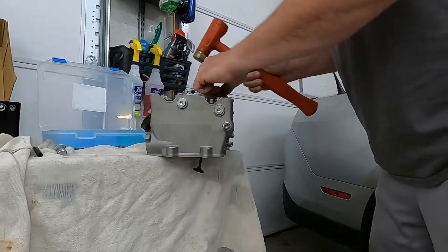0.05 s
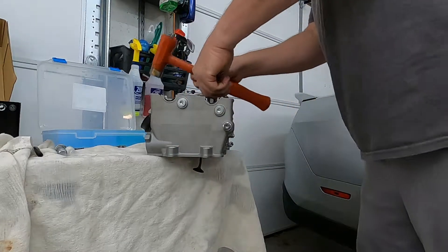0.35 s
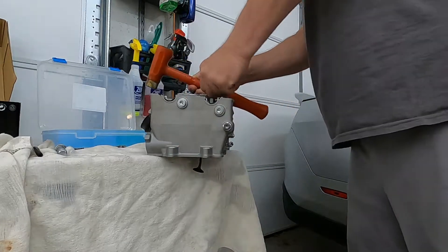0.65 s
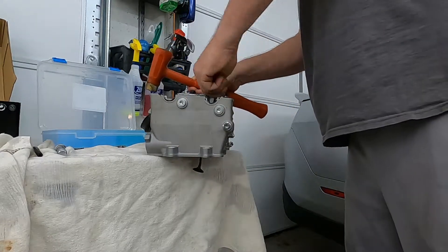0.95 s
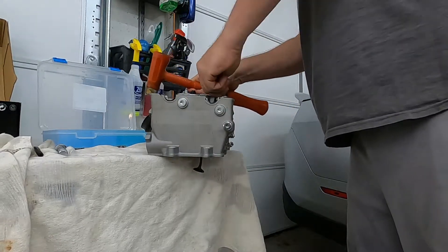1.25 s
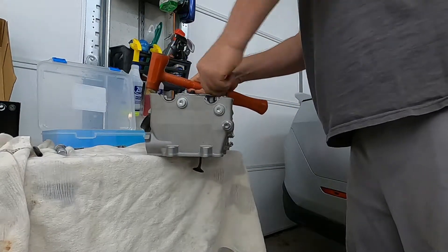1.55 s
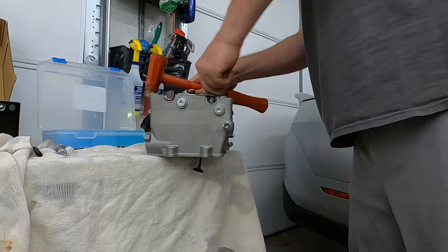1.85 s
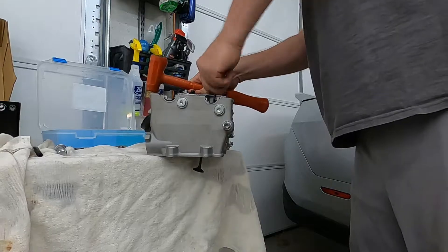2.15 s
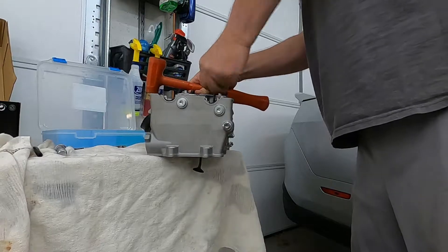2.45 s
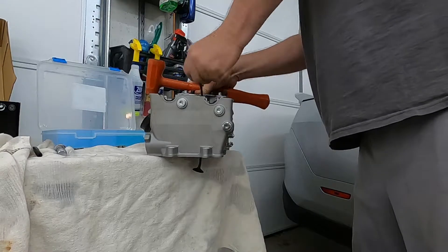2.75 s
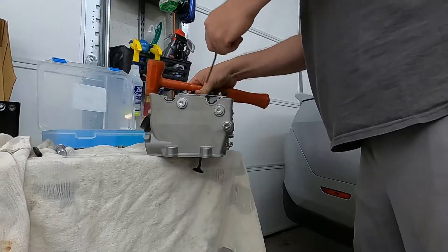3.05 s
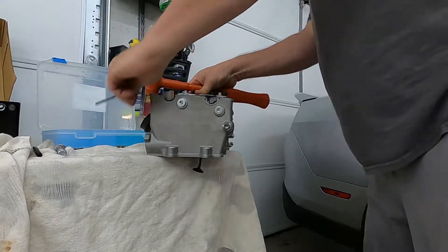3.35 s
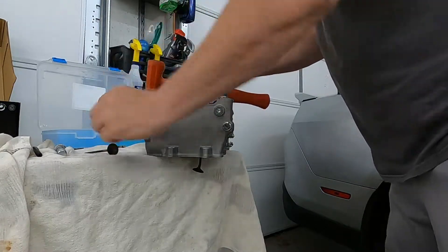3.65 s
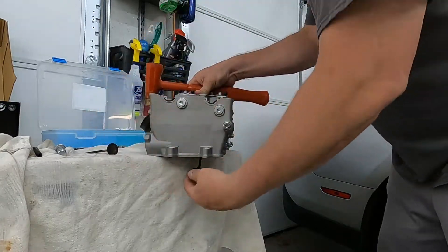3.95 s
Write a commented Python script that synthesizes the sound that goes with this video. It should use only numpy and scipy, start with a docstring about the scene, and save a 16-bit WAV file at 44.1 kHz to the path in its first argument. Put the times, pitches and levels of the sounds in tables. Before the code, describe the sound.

A steel key scrapes a tight screw, clatters free and thuds onto a bench.

```python
"""A long steel key works a tight screw in an aluminium engine housing on a cloth-covered garage bench.
A metal knock dies away over faint room hum, and clothes rustle as the arm reaches over. Each turn
scrapes in gritty stick-slip bursts and rocks the housing, with light ticks of steel on steel.
Near 2.85 s the key clatters free of the screw head; near 3.7 s it is set down with a thud and
a jingle. A few last ticks follow, and the clothes rustle again."""
import sys
import numpy as np
from scipy import signal
from scipy.fft import rfft, irfft, next_fast_len
from scipy.io import wavfile
from scipy.ndimage import map_coordinates

SR = 44100
rng = np.random.default_rng(int(sys.argv[2]) if len(sys.argv) > 2 else 0)


def master(y):
    """Save y as 16-bit WAV."""
    cut = np.clip(np.atleast_2d(y).T, -1, 1)
    pcm = np.round(cut * 32767)  # scale
    wavfile.write(sys.argv[1], SR, pcm.astype(np.int16))


N = 176400
T = np.arange(N) / SR

# how alike left and right are, from near mono bass to wide treble: freq_hz, correlation
STEREO_LIKENESS = [(50, 0.82), (250, 0.94), (600, 0.86), (1200, 0.66), (2500, 0.62), (4500, 0.23),
                   (12000, .05)]
LEFT_RIGHT = np.array([[.5], [-.5]])  # splits a difference between the two sides


def amp(db):
    """Decibels to gain."""
    return 10 ** (np.asarray(db) / 20)


def unit(x):
    """Scale to rms 1."""
    return x / np.sqrt(np.mean(x ** 2) + 1e-20)


def along(points, hz):
    """Read a curve of (freq_hz, value) points on a log frequency axis."""
    freqs, values = np.transpose(points)
    return np.interp(np.log(hz + 1), np.log(freqs + 1), values)


def fader(points):
    """Gain per sample from (time_s, level_db) points."""
    return amp(np.interp(T, *np.transpose(points)))


def filtered(x, response):
    """Zero-phase EQ; response maps frequency to gain."""
    size = next_fast_len(x.shape[-1] + SR // 4)
    gains = response(np.fft.rfftfreq(size, 1 / SR))
    return irfft(rfft(x, size) * gains, size)[..., :x.shape[-1]]


def colour(x, eq, size=8192):
    """Minimum-phase EQ: nothing rings ahead of an attack, and white noise keeps its power."""
    cepstrum = irfft(np.log(amp(along(eq, np.fft.rfftfreq(size, 1 / SR)))))
    cepstrum[1:size // 2] *= 2
    cepstrum[size // 2 + 1:] = 0
    impulse = irfft(np.exp(rfft(cepstrum)))
    return signal.fftconvolve(x, impulse[None] / np.linalg.norm(impulse), axes=1)[:, :N]


def add(track, start_s, x):
    """Mix x into the track at start_s."""
    i = max(0, round(start_s * SR))
    track[:, i:i + x.shape[-1]] += x[..., :max(0, N - i)]


def stereo_angle(hz):
    """Angle between left and right in radians: 0 is mono, pi/2 is unrelated."""
    return np.arccos(np.clip(along(STEREO_LIKENESS, hz), -1, 1))


def widen(pair):
    """Two unrelated signals become left and right, alike in the bass."""
    def mid_side_gains(hz):
        turn = stereo_angle(hz) / 2
        return np.array([np.cos(turn), np.sin(turn)])
    mid, side = filtered(pair, mid_side_gains)
    return np.array([mid + side, mid - side])


def panned(x, pan):
    """Tilt the sound between left and right, by frequency."""
    return filtered(x, lambda hz: amp(along(pan, hz) * LEFT_RIGHT))


def noise_bed(eq):
    """Steady coloured stereo noise of rms 1."""
    white = rng.standard_normal((2, N))
    return unit(widen(filtered(white, lambda hz: amp(along(eq, hz)))))


def garage(x, wet_db, build_s=0.0023):
    """The direct sound plus the garage's diffuse reverb, whose treble dies first."""
    # reverb time of the room: freq_hz, t60_s
    decay = [(100, 0.8), (400, 0.52), (1500, 0.56), (4000, 0.53), (8000, 0.42), (14000, 0.29)]
    hz, t, spectrum = signal.stft(rng.standard_normal((2, SR)), SR, nperseg=256)
    spectrum = spectrum * amp(-60 * t / along(decay, hz)[:, None])
    tail = signal.istft(spectrum, SR, nperseg=256)[1][:, :SR]
    tail = widen(tail) * (1 - np.exp(-(T[:SR] / build_s) ** 2))
    reverb = signal.fftconvolve(x[:1], tail / np.linalg.norm(tail[0]), axes=1)[:, :N]
    return x + amp(wet_db) * reverb


def hits(starts_s, levels_db, eq, t60_s, rise_s=0.00061):
    """Short contacts: dense, quickly damped vibration, played as bursts of coloured noise."""
    track, t = np.zeros((2, N)), T[:SR // 5]
    for start_s, db in zip(starts_s, levels_db):
        envelope = amp(db - 60 * t / t60_s) * (1 - np.exp(-t / rise_s))
        add(track, start_s, envelope * rng.choice([-1, 1], (2, len(t))))
    return widen(colour(track, eq))


def rings(starts_s, levels_db, modes, rise_cycles=0.61, spread_db=0.8):
    """Every contact rings the modes a little differently; high modes reach the two sides out of step."""
    track, t = np.zeros((2, N)), T[:SR // 2]
    partials = []
    for hz, db, t60_s in modes:
        attack = 1 - np.exp(-(t * hz / rise_cycles) ** 2)
        partials.append(attack * amp(db - 60 * t / t60_s) * np.exp(2j * np.pi * hz * t))
    phase_offset = stereo_angle(np.array(modes)[:, 0]) * LEFT_RIGHT
    for start_s, db in zip(starts_s, levels_db):
        phase = 2 * np.pi * rng.random(len(modes)) + phase_offset * rng.choice([-1, 1], len(modes))
        weights = amp(rng.normal(0, spread_db, len(modes))) * np.exp(1j * phase)
        add(track, start_s, amp(db) * (weights @ np.array(partials)).imag)
    return track


def scrapes(starts_s, lengths_s, levels_db, eq, catch=1.7):
    """Bursts of stick-slip grains of uneven size and spacing: a first catch, hold, release."""
    grains_per_s, spread_db = 600, 3.5
    rise_s, fall_20db_s = .001, 0.031
    track, t = np.zeros((2, N)), T[:SR // 4]
    for start_s, length_s, db in zip(starts_s, lengths_s, levels_db):
        onsets = rng.random(len(t)) < grains_per_s / SR
        sizes = onsets * amp(np.minimum(rng.normal(0, spread_db, len(t)), 2 * spread_db))
        sizes[round(rise_s * SR)] = catch
        grains = unit(sizes * rng.choice([-1, 1], (2, len(t))))
        envelope = (1 - np.exp(-t / rise_s)) * amp(-20 * np.maximum(t - length_s, 0) / fall_20db_s)
        add(track, start_s, amp(db) * envelope * grains)
    return widen(colour(track, eq))


def wobble(rate_hz):
    """A smooth random drift around zero."""
    return map_coordinates(rng.standard_normal(int(N * rate_hz / SR) + 4), [T * rate_hz])


def room_tone(air_db=-60.5):
    """Faint mains hum under low room air whose level wavers."""
    # mains harmonics: pitch_hz, level_db
    harmonics = [(119.5, -79.5), (360, -74.5), (479.5, -86), (599, -91.5)]
    # colour of the air: freq_hz, gain_db
    air_eq = [(12, -34), (20, -0.5), (118, -7.5), (174, -8.5), (328, -23.5), (367, -16), (445, -23),
              (484, -9), (540, -34.5), (587, -26.5), (2280, -42), (3180, -39), (15000, -61)]
    hum = sum(amp(db) * np.sqrt(2) * np.sin(2 * np.pi * (hz * T + rng.random())) for hz, db in harmonics)
    return hum + amp(air_db + wobble(rate_hz=5.66)) * noise_bed(air_eq)


def clothes(flutter_db=-0.1):
    """Fabric rubs as the arm moves, loudest at the start and the end."""
    # swell of the rustle: time_s, level_db
    swell = [(0, -53.5), (.15, -65.5), (.36, -69), (.55, -75), (.85, -84), (1.15, -74.5), (1.4, -66.5),
             (2.8, -69.5), (3.3, -74.5), (3.48, -71), (3.57, -68), (3.66, -69.5), (3.9, -72.5),
             (3.96, -53.5), (4, -45.5)]
    # colour of rubbing cloth: freq_hz, gain_db
    cloth_eq = [(200, 0.5), (800, -7.5), (1400, 2), (2150, 3.5), (2750, -1.5), (3500, -1.5), (4600, 2),
                (5600, -6), (6100, -5), (8000, -12), (8800, -11), (11000, -23.5), (15000, -32)]
    return fader(swell) * amp(flutter_db * wobble(rate_hz=58)) * noise_bed(cloth_eq)


def fading_knock(tail_db=-41.5, tail_t60_s=0.47):
    """The housing and the room still ring from a knock as the scene opens."""
    # ring of the housing: pitch_hz, level_db, t60_s
    housing_modes = [(944, -34.5, 0.2), (1657, -61.5, 0.56), (2160, -65.5, 0.98), (3160, -55, 0.2),
                     (5870, -62, 0.43), (486, -51, 0.22), (249, -48.5, 0.18)]
    # colour of the room's tail: freq_hz, gain_db
    tail_eq = [(59, -2.5), (100, 8.5), (182, -9.5), (332, -7.5), (698, -17.5), (933, -8.5), (1150, -25),
               (1350, -23), (4050, -20.5), (14000, -70)]
    return rings([0], [0], housing_modes) + amp(tail_db - 60 * T / tail_t60_s) * noise_bed(tail_eq)


def key_ticks(tip_offset_db=-15):
    """Light touches of steel on steel, each pinging at its own pitch over the ring of the key's tip."""
    # touches: start_s, click_db, pitch_hz, ping_db
    touches = [(0.514, -59, 3270, -71), (1.038, -68, 3170, -72.5), (1.311, -58, 13000, -90),
               (1.356, -46, 3420, -59), (1.48, -54, 6560, -74), (1.578, -50, 4300, -57),
               (1.7322, -44.5, 11000, -71), (1.82, -53, 4230, -60), (1.828, -51, 6180, -63),
               (1.863, -52, 3595, -54.5), (1.924, -50, 11100, -77), (2.135, -41.5, 2083, -46.5),
               (2.389, -42, 4630, -67), (2.431, -63.5, 6030, -62), (2.4505, -55, 3580, -49.5),
               (2.476, -56, 9560, -76), (2.618, -56.5, 6080, -64.5), (2.699, -47.5, 6130, -61.5),
               (3.78, -49, 6700, -73), (3.913, -55, 7240, -64.5), (3.951, -49, 5200, -55)]
    # colour of the click: freq_hz, gain_db
    click_eq = [(500, -47), (2200, 0.5), (3200, 0.5), (5200, -1.5), (7400, -1), (8800, -19), (15000, -41)]
    # partials of a ping: pitch_ratio, level_db, t60_s
    ping_modes = [(.665, -5, .07), (0.976, 1, 0.066), (1.001, 6.5, 0.071), (1.03, 0, 0.043),
                  (1.202, -10, 0.073)]
    # thin, bright ring of the tip: pitch_hz, level_db, t60_s
    tip_modes = [(3560, -2, .08), (4290, 0, .09), (6060, -2, .1), (7320, -9, .07), (9560, -15, .1),
                 (10900, -13, .12), (11700, -22, .09), (13120, -22, .11)]
    start_s, click_db, _, _ = np.transpose(touches)
    pings = sum(rings([at_s], [db], np.array(ping_modes) * [hz, 1, 1]) for at_s, _, hz, db in touches)
    clicks = hits(start_s, click_db, click_eq, t60_s=0.011)
    tip = rings(start_s, click_db + tip_offset_db, tip_modes)
    return garage(clicks, wet_db=-5) + garage(pings + tip, wet_db=-14.5)


def key_set_down():
    """The handle thumps the cloth-covered bench and bounces; loose parts jingle."""
    # landings of the handle: start_s, thump_db, slap_db, jingle_db, bench_db
    landings = [(3.665, -44.5, -55, -99, -56), (3.681, -25.5, -20.5, -47, -49),
                (3.6873, -22, -37, -38.5, -27.5), (3.7, -24, -51, -39.5, -61),
                (3.759, -25.5, -38.5, -56, -35), (3.827, -54, -56, -84, -54.5), (3.848, -51, -57, -90, -46)]
    # colours of the low thump, mid slap and bright jingle: freq_hz, gain_db
    thump_eq = [(40, -27), (110, -19.5), (165, 2), (300, -4), (470, 1), (620, -7), (900, -19.5),
                (2000, -35), (8000, -80)]
    slap_eq = [(150, -26), (600, 3), (1200, 5), (1550, 1), (1950, 9), (2700, -29), (4500, -17.5),
               (12000, -66)]
    jingle_eq = [(1000, -21.5), (2500, 7), (3700, 2.5), (5200, -11), (6100, -0.5), (6700, -4), (7300, -13),
                 (10000, -24), (15000, -46)]
    # ring of the bench and of loose steel parts: pitch_hz, level_db, t60_s
    bench_modes = [(181, 2, .33), (212, -11, .2), (286, -6.5, .3), (337, -8, .24), (422, -3, .28),
                   (453, 1, .22), (524, -5, .22), (603, -14, .3), (655, -8, .2), (727, -14, .25)]
    loose_modes = [(3500, 3.5, 0.24), (3720, -14, 0.23), (5060, -15, 0.15), (6072, -11, 0.27),
                   (6400, -11, .2), (6360, -11, 0.22), (6540, -2, 0.16), (9140, -16, .2), (9980, -14, 0.17),
                   (12200, -27, .22), (14200, -31, 0.22)]
    start_s, thump_db, slap_db, jingle_db, bench_db = np.transpose(landings)
    thump = hits(start_s, thump_db, thump_eq, t60_s=0.063, rise_s=0.0014)
    slap = hits(start_s, slap_db, slap_eq, t60_s=0.019, rise_s=0.0013)
    jingle = hits(start_s, jingle_db, jingle_eq, t60_s=0.043, rise_s=0.0023)
    contact = garage(thump + slap + jingle, wet_db=-4)
    bench = rings(start_s, bench_db, bench_modes)
    loose_parts = rings(start_s, jingle_db, loose_modes)
    return amp(1.5) * contact + amp(2) * bench + amp(-19) * loose_parts


def key_clatter(hollow_offset_db=-4):
    """The key snaps out of the screw head and rattles against the housing."""
    # clacks: start_s, dull_db, hard_db, treble_db, ring_db, treble_left_over_right_db
    clacks = [(2.848, -33.5, -48, -37.5, -59.5, -6), (2.8589, -21.5, -40.5, -54.5, -41.5, 3),
              (2.8647, -52, -24, -30.5, -23.5, -18.5), (2.8705, -36, -21.5, -23.5, -26, 1),
              (2.8746, -57, -29, -36, -30, 2), (2.8854, -47.5, -29, -34.5, -51.5, 15),
              (2.8941, -59, -21, -33, -31, -1.5), (2.9049, -61.5, -40, -29, -48, -3),
              (2.913, -61, -44, -37.5, -44, 4), (2.9759, -58.5, -22.5, -29, -28.5, -8.5),
              (2.9827, -59, -26.5, -28, -23.5, -6.5), (2.9997, -52.5, -31, -25.5, -53, 12.5),
              (3.0116, -53, -40.5, -29, -57, 7.5), (3.0232, -41.5, -42, -31.5, -30.5, -7),
              (3.0326, -51.5, -31, -43.5, -57, -12)]
    # colours of a clack's dull body, hard attack and treble edge: freq_hz, gain_db
    dull_eq = [(80, -24), (250, -8.5), (600, -3.5), (1000, -3), (1250, 6.5), (1500, -4), (1800, -5),
               (3000, -4), (4500, -22), (12000, -42)]
    hard_eq = [(400, -16), (1300, -22), (1750, -1), (2150, -2.5), (2650, -11.5), (3140, 2.5), (3600, -3),
               (4700, -3.5), (5800, -14.5), (9000, -9), (15000, -35)]
    treble_eq = [(2000, -20.5), (4500, -1.5), (6800, 0.5), (8200, -5), (9900, -1), (10500, -8.5),
                 (11200, -5), (12200, -12), (14500, -19.5), (16000, -29)]
    # hollow knock of the housing, and long ring of key and housing: pitch_hz, level_db, t60_s
    hollow_modes = [(240, -9, .035), (335, -6, .03), (620, -8, .022), (790, -8, .025), (960, -3, .035),
                    (1140, -2, .03), (2130, -9, .02), (3500, -8, .02)]
    metal_modes = [(945, -8, .19), (1735, -7, .2), (2127, -3, .24), (3105, 1, .07), (3144, 2, .12),
                   (3203, -5, .18), (3243, -2, .2), (3280, -7, .2), (4325, -7, .22), (4686, -5, .25),
                   (4892, -6, .25), (5034, -8, .2), (6420, -11, .22), (7620, -11, .2), (8720, -11, .2),
                   (9650, -7.5, .2), (9930, -11, .16), (11000, -11, .22), (13000, -20, .22)]
    start_s, dull_db, hard_db, treble_db, ring_db, pan_db = np.transpose(clacks)
    dull = hits(start_s, dull_db, dull_eq, t60_s=0.022)
    hollow = rings(start_s, dull_db + hollow_offset_db, hollow_modes)
    hard = hits(start_s, hard_db, hard_eq, t60_s=0.025)
    treble = hits(start_s, treble_db, treble_eq, t60_s=0.025)
    treble *= amp(np.interp(T, start_s, pan_db) * LEFT_RIGHT)
    contact = garage(dull + hollow + hard + treble, wet_db=-7)
    ring = garage(rings(start_s, ring_db, metal_modes), wet_db=-35)
    return amp(1) * contact + amp(-13) * ring


def housing_rumble():
    """The housing rocks on the bench with each turn: swells of low noise."""
    # swells of the rocking: time_s, level_db
    swells = [(0, -59), (.4, -57.5), (1.1, -57), (1.23, -77), (1.35, -45), (1.46, -49.5), (1.53, -38.5),
              (1.69, -54), (1.77, -34.5), (1.83, -41), (1.86, -53.5), (2.03, -39), (2.25, -55), (2.37, -40),
              (2.42, -49), (2.6, -33), (2.7, -39), (2.98, -53), (3.04, -42), (3.23, -55), (3.4, -65),
              (3.6, -80)]
    # colour of the rumble: freq_hz, gain_db
    rumble_eq = [(20, -24.5), (45, -6.5), (75, 3), (100, -5), (120, 6.5), (150, -20.5), (300, -53),
                 (1000, -83)]
    return amp(-6) * fader(swells) * noise_bed(rumble_eq)


def key_turning(ring_offset_db=-4.5):
    """The strained key sticks and slips in the screw; each slip knocks the housing and sets it ringing."""
    # slips of the key: start_s, length_s, rasp_db, knock_db, grit_db
    slips = [(0.134, 0.08, -75, -66, -65), (0.347, 0.051, -93, -69.5, -76), (0.872, 0.091, -89, -84, -100),
             (1.193, 0.044, -59.5, -54.5, -74), (1.226, 0.015, -62, -71, -64.5),
             (1.282, 0.033, -45, -45, -59.5), (1.3261, 0.0049, -35, -41.5, -48.5),
             (1.33, 0.041, -47, -35, -67), (1.353, 0.003, -49, -55, -54), (1.515, 0.039, -45, -45, -57),
             (1.576, 0.0045, -47.5, -47, -48), (1.588, 0.032, -47.5, -41, -51),
             (1.733, .03, -57.5, -49, -80), (1.776, 0.018, -42.5, -42.5, -95),
             (1.819, 0.0073, -60, -47, -48), (1.845, 0.0078, -41, -43.5, -56),
             (1.8605, 0.015, -50, -39.5, -48.5), (2.049, 0.034, -47.5, -46, -60),
             (2.13, 0.018, -52, -50, -46), (2.143, 0.026, -46.5, -40, -51.5),
             (2.216, 0.043, -66, -56.5, -62), (2.319, 0.037, -81, -55, -64),
             (2.3562, 0.018, -39.5, -44, -46), (2.376, 0.028, -51, -46.5, -55),
             (2.389, 0.017, -80, -49, -46.5), (2.424, 0.014, -47, -54, -55.5),
             (2.448, 0.016, -41.5, -38.5, -43.5), (2.474, 0.014, -57, -44.5, -51),
             (2.518, 0.014, -54, -47.5, -56.5), (2.613, 0.006, -55, -55, -55.5),
             (2.658, 0.015, -43.5, -43.5, -55), (2.698, 0.016, -66.5, -42, -54),
             (2.726, 0.015, -42.5, -42.5, -56.5), (2.792, 0.036, -80, -49.5, -82)]
    # colours of the mid rasp, bright grit and low knock: freq_hz, gain_db
    rasp_eq = [(150, -19.5), (450, 0), (750, -1.5), (1000, -2.5), (1400, 1), (2100, -0.5), (2700, -10),
               (4000, -18.5), (7000, -30), (15000, -70.5)]
    grit_eq = [(600, -34), (2100, 10.5), (2800, 0), (3500, 1.5), (3900, -5.5), (4400, -0.5), (5400, -9.5),
               (7300, -18), (10000, -27.5), (15000, -41)]
    knock_eq = [(50, -17), (120, -18.5), (180, 3.5), (235, -7.5), (340, -1), (480, -8), (700, -19),
                (1300, -49), (5000, -93)]
    # ring of the strained housing: pitch_hz, level_db, t60_s
    housing_ring_modes = [(1430, -4, .08), (1830, -1, .09), (2126, 1, .11), (3140, -6, .08), (3475, 0, .08),
                          (3555, -2, .08), (4265, -2, .09), (4740, -7, .08), (6050, -12, .1), (7250, -14, .1)]
    start_s, length_s, rasp_db, knock_db, grit_db = np.transpose(slips)
    rasp = scrapes(start_s, length_s, rasp_db, rasp_eq)
    grit = scrapes(start_s, length_s, grit_db, grit_eq)
    ring = garage(rings(start_s, grit_db + ring_offset_db, housing_ring_modes), wet_db=-21)
    scrape = garage(rasp + grit, wet_db=-3.5)
    knock = garage(scrapes(start_s, length_s, knock_db, knock_eq, catch=1), wet_db=-1.5)
    return ring + amp(-4.5) * scrape + amp(-2.5) * knock


def scene():
    """The bench work sits to the left; the very top of the clatter leans right."""
    # stereo placement of the bench work and of the clatter: freq_hz, left_over_right_db
    bench_pan = [(100, 1), (400, 0.5), (1000, 3.5), (2500, 6.5), (6000, 3), (14000, -2)]
    clatter_pan = [(500, 0), (3000, 2.2), (6000, 2.5), (9000, -2), (14000, -5)]
    bench_work = panned(key_turning() + housing_rumble() + key_ticks() + key_set_down(), bench_pan)
    clatter = panned(key_clatter(), clatter_pan)
    return bench_work + clatter + fading_knock() + room_tone() + clothes()


def record(dry):
    """A steep low-pass trims the very top."""
    top_hz, edge_hz = 15900, 700
    return filtered(dry, lambda hz: np.clip((top_hz - hz) / edge_hz, 0, 1) ** 2)


dry = scene()
out = record(dry)
master(out)
```